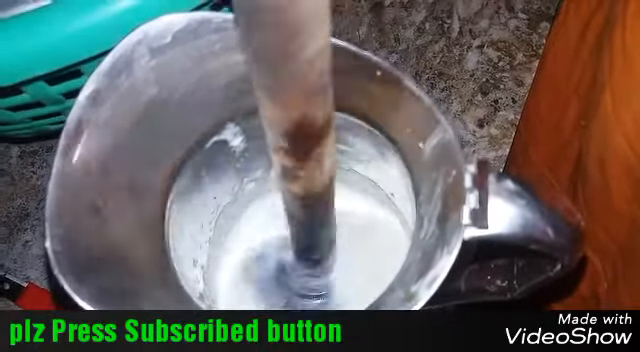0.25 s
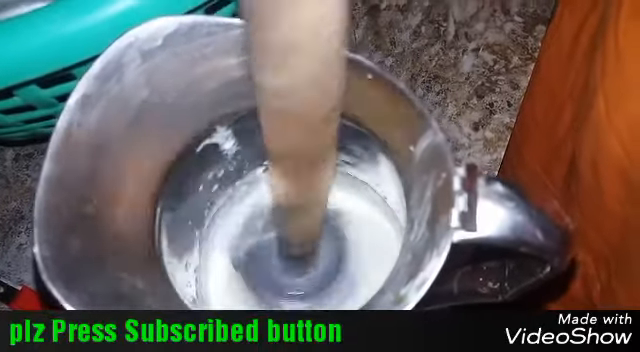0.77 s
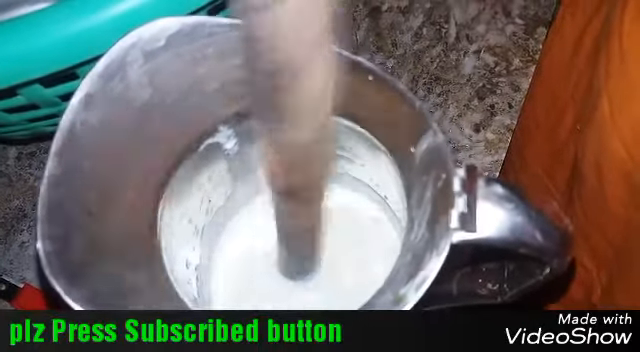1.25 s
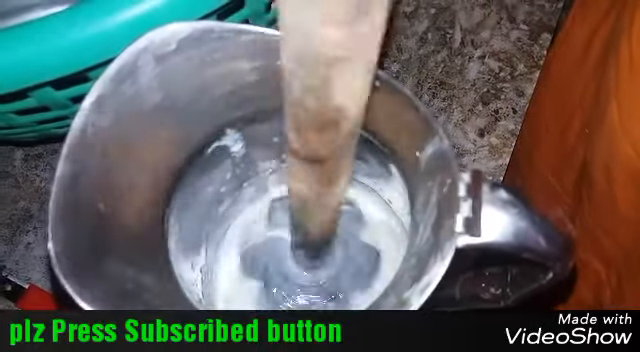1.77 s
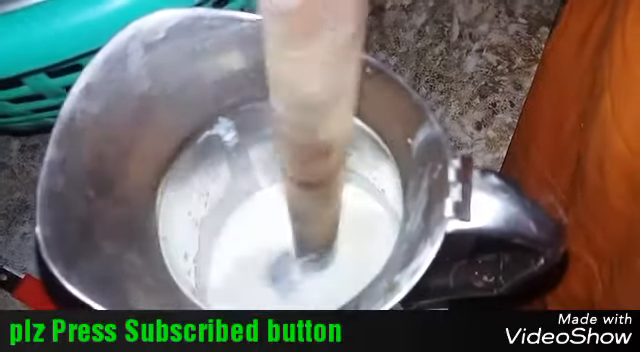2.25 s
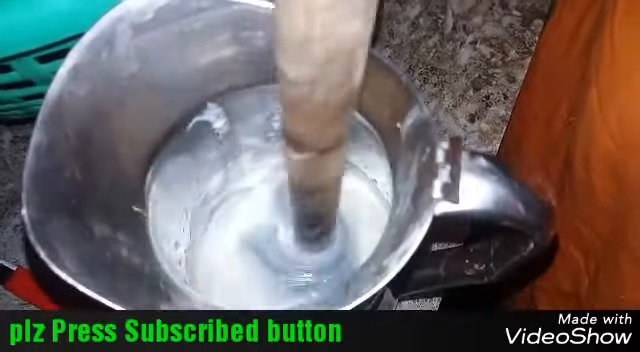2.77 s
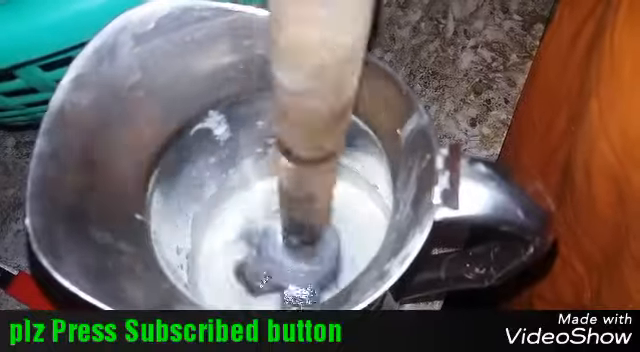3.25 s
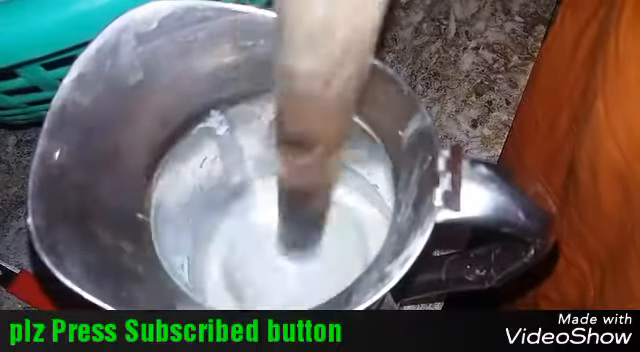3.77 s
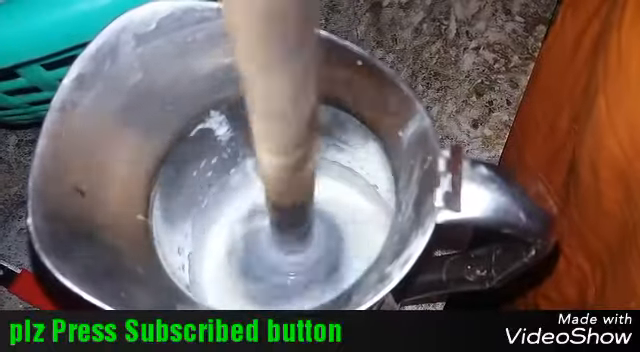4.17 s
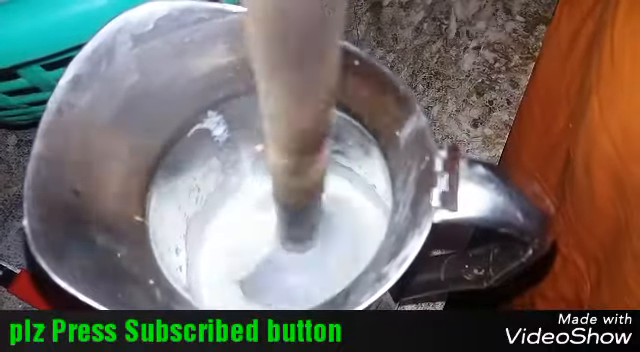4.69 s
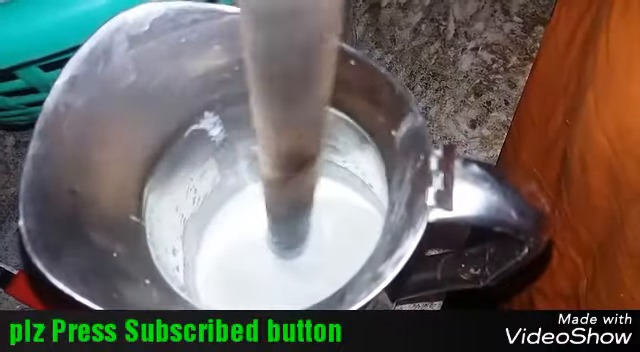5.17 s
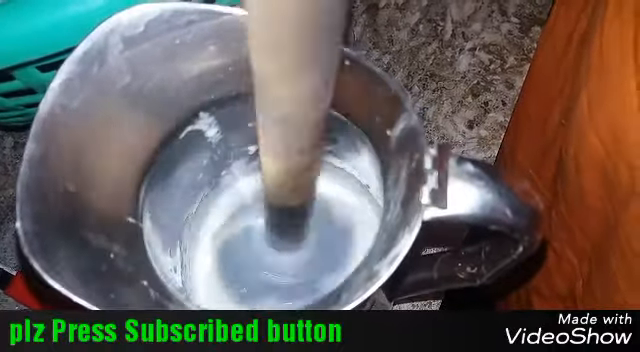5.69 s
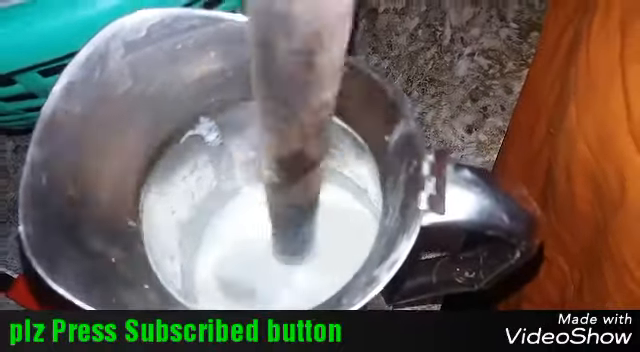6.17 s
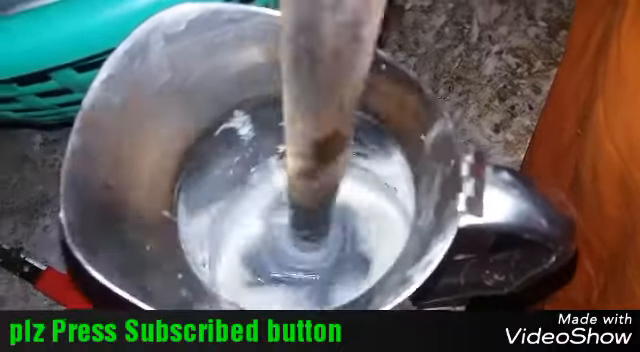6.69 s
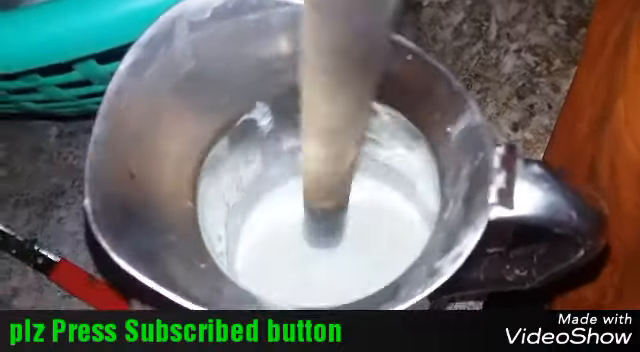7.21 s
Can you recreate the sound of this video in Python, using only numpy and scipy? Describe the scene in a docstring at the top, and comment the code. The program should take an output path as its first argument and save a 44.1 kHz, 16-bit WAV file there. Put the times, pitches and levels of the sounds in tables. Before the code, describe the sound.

A wooden hand churner spins to and fro in thin yogurt inside a steel jug. Quick, uneven wet slaps and light clacks hit the wall over hollow gulps, a low slosh and fizzing bubbles. The jug rings briefly and now and then rocks on the counter with a dull thud. The churning slackens after about five seconds, then picks up again. The microphone is close, in a quiet kitchen.

```python
"""Churning yogurt in a steel jug

A kitchen, the microphone close to the jug. A wooden hand churner is spun to and fro in thin yogurt.
Its head traps air with low gulps, slaps liquid on the wall and throws up drops and bubbles.
The jug rings along and rocks on the counter; the room adds a short tail and a steady hush."""
import sys
import numpy as np
from scipy import signal
from scipy.fft import rfft, irfft, next_fast_len
from scipy.io import wavfile
from scipy.ndimage import uniform_filter1d

SR = 44100
rng = np.random.default_rng(int(sys.argv[2]) if len(sys.argv) > 2 else 0)


def master(y):
    """Save y as 16-bit WAV."""
    cut = np.clip(np.atleast_2d(y).T, -1, 1)
    pcm = np.round(cut * 32767)  # scale
    wavfile.write(sys.argv[1], SR, pcm.astype(np.int16))


N = 328545

# spectrum of the kitchen air: freq_hz, level_db
HUSH_SPECTRUM = [(15, -49), (32, 21), (133, 25.5), (197, 2), (554, -64), (1920, 0), (2780, -30),
                 (4250, 4.5), (11000, -50)]
# how long the kitchen rings: freq_hz, t60_s
KITCHEN_DECAY = [(150, 0.93), (500, 0.55), (1500, 0.23), (4000, 0.37), (9000, 0.39)]
# thuds of the jug's base on the counter: start_s, level_db, pitch_hz
ROCKS = [(0.804, -19, 80.6), (1.38, -17, 117), (1.749, -27, 97), (1.814, -17, 203), (2.583, -25, 117),
         (2.809, -10.5, 203), (2.929, -22.5, 103), (3.282, -18.5, 200), (3.58, -34, 113), (3.809, -28, 206),
         (3.942, -27, 205), (4.286, -21, 101), (4.288, -15, 198), (4.34, -16, 190), (4.547, -13, 199),
         (4.624, -17, 205), (5.599, -26, 222), (5.798, -28, 200), (6.153, -50, 191), (6.24, -42, 200),
         (6.475, -24, 194), (6.558, -15.5, 219), (6.989, -24, 113)]
# modes of the jug's wall and air column: pitch_hz, level_db, t60_s
JUG_MODES = [(220, 5.5, 0.076), (306, 4, 0.22), (371, 2, 0.085), (481, 1.5, 0.27), (710, 7.5, 0.092),
             (1110, -22, 0.094), (1517, 18.5, 0.019), (1923, 17.5, 0.13), (2632, 16.5, 0.0084),
             (3250, 10, 0.031), (4070, 9.5, 0.02), (4572, 10.5, 0.025), (4900, 17.5, 0.002)]
# effort of the churning, as levels of liquid, small drops and finest drops:
# time_s, slosh_db, spray_db, spit_db
EFFORT = [(0.0, -17, -31, -28), (0.08, -53, -38, -64), (0.37, -30, -23.5, -28), (0.77, -28, -30, -57),
          (1.37, -35.5, -46.5, -51), (1.64, -35, -29.5, -52), (2.22, -32.5, -35.5, -63),
          (2.59, -34, -42.5, -71), (3.3, -36, -31.5, -43), (3.57, -34.5, -36, -45),
          (4.732, -30.5, -28, -31.5), (5.31, -45.5, -53.5, -65), (5.62, -41.5, -44, -41.5),
          (6.27, -39.5, -49, -79), (6.6, -29, -28, -33.5), (6.93, -31.5, -40, -32),
          (7.12, -30.5, -42.5, -94), (7.45, -51, -58, -73)]
# spectrum of the turning liquid: freq_hz, level_db
SLOSH_SPECTRUM = [(18, -32), (30, -37), (92, -3), (140, -21), (197, -1.5), (263, -5.5), (419, 3), (466, 3),
                  (877, -17), (1100, -13), (1430, -68)]
# spectrum of the fizzing drops: freq_hz, level_db
SPRAY_SPECTRUM = [(470, -38), (800, -20), (1120, 5), (1470, 17.5), (1870, 19), (2190, -4.5), (2500, 14.5),
                  (4540, 11.5), (6300, 8.5), (12400, 11.5), (14600, -61)]
# short bright bursts of treble hiss, mostly at the slaps: start_s, level_db
HISS_BURSTS = [(0.1336, -28.5), (0.2394, -23), (0.6205, -16), (0.801, -14.5), (0.9645, -23), (1.065, -19.5),
               (1.1656, -13), (1.202, -21), (1.5663, -21), (1.854, -21.5), (2.147, -20), (2.8864, -17.5),
               (3.5356, -23), (4.136, -14.5), (4.265, -16), (4.289, -13), (4.344, -15), (4.7321, -17),
               (4.7815, -17), (4.88, -21), (5.025, -22), (6.5316, -24), (6.9423, -17)]
# large single bubbles that chirp upward: start_s, level_db, pitch_hz, glide_ratio
BIG_BUBBLES = [(0.1386, -22, 1800, 0.58), (0.877, -9, 1372, 0.8), (1.123, -11.5, 1290, 0.58),
               (1.872, -20, 1600, 0.42), (2.222, -19, 1410, 0.7), (2.327, -10.5, 1447, 0.4),
               (2.364, -14.5, 1114, 2.4), (2.908, -16.5, 1030, 0.35), (3.245, -7.5, 2300, 1.05),
               (4.095, -11.5, 1407, 0.21), (4.759, -15, 1234, 0.54), (5.088, -20.5, 1650, 0.14),
               (5.6081, -14.5, 1310, 0.63), (6.5287, -20, 1440, 0.11), (6.681, -22, 1410, 0.22),
               (6.776, -16, 1324, 0.57), (6.9549, -25, 1720, 0.3), (7.084, -15.5, 1284, 0.44),
               (7.181, -25, 1470, 0.38), (7.3, -26.5, 1336, 0.86)]
# air pockets trapped by the churner head: start_s, level_db, pitch_hz, t60_s
GULPS = [(0.059, -18, 480, 0.033), (0.191, -22.5, 411, 0.075), (0.245, -18, 504, 0.02),
         (0.279, -15, 497, 0.071), (0.421, -23, 650, 0.033), (0.496, -16.5, 437, 0.017),
         (0.543, -22.5, 600, 0.035), (0.566, -24, 383, 0.043), (0.662, -19.5, 395, 0.098),
         (0.719, -19, 454, 0.0075), (0.802, -19, 373, 0.029), (0.978, -24, 420, 0.058),
         (1.111, -17.5, 647, 0.024), (1.139, -19, 496, 0.11), (1.178, -17, 401, 0.11),
         (1.439, -16, 436, 0.045), (1.472, -28, 462.5, 0.41), (1.563, -27, 386, 0.068),
         (1.732, -26.5, 483, 0.019), (1.811, -20, 414, 0.087), (1.873, -34, 439, 0.2),
         (1.998, -21.5, 384, 0.078), (2.139, -22.5, 485.4, 0.24), (2.3, -19.5, 422, 0.055),
         (2.424, -28, 537, 0.11), (2.692, -27.5, 517, 0.022), (2.802, -25, 477, 0.017),
         (2.814, -17.5, 415, 0.091), (2.945, -25, 376, 0.007), (3.278, -20.5, 453, 0.022),
         (3.29, -23.5, 394, 0.11), (3.43, -25, 513, 0.033), (3.575, -13, 494, 0.25),
         (3.612, -14, 454, 0.05), (3.658, -21, 461.7, 0.19), (3.694, -26, 457, 0.088),
         (3.757, -22.5, 487, 0.11), (3.815, -16, 401, 0.052), (3.95, -27, 397, 0.079),
         (4.039, -25.5, 388, 0.06), (4.174, -21.5, 385, 0.092), (4.287, -19.5, 418, 0.17),
         (4.401, -14, 466, 0.015), (4.436, -23.5, 465.3, 0.16), (4.543, -17.5, 517, 0.045),
         (4.585, -21.5, 431, 0.086), (4.613, -18, 478, 0.019), (4.722, -24, 560, 0.062),
         (4.809, -25.5, 488, 0.39), (5.027, -19, 517, 0.05), (5.274, -31, 514, 0.048),
         (5.356, -27.5, 537, 0.031), (5.483, -25.5, 550, 0.046), (5.518, -23.5, 492, 0.41),
         (5.6, -24, 496, 0.27), (5.798, -30, 334, 0.02), (5.944, -31.5, 358, 0.031),
         (6.013, -24, 369, 0.04), (6.159, -30.5, 480, 0.047), (6.24, -26.5, 445, 0.018),
         (6.423, -22.5, 494, 0.068), (6.481, -16, 476, 0.011), (6.568, -19, 458, 0.022),
         (6.603, -25.5, 459, 0.089), (6.727, -29.5, 488, 0.12), (6.905, -25.5, 505, 0.027),
         (6.937, -28.5, 557, 0.07), (6.99, -25, 390, 0.017), (7.085, -29.5, 577, 0.034),
         (7.203, -18.5, 500, 0.14), (7.281, -23.5, 516, 0.057)]
# liquid and wood hitting the wall, short ones dry, long ones wet: start_s, level_db, centre_hz, t60_s
SLAPS = [(0.0034, -3, 3840, 0.023), (0.0559, -9, 4100, 0.052), (0.1327, -12, 1730, 0.037),
         (0.19, -5.5, 2680, 0.026), (0.21, -17, 1530, 0.041), (0.239, -7.5, 4500, 0.022),
         (0.2682, -5.5, 1480, 0.065), (0.392, -14.5, 4100, 0.036), (0.4214, -5.5, 2700, 0.026),
         (0.482, -3.5, 2600, 0.019), (0.4998, -20.5, 3930, 0.24), (0.538, -7.5, 1670, 0.043),
         (0.6, -6.5, 5400, 0.015), (0.621, -9.5, 4660, 0.0055), (0.634, -2, 2960, 0.041),
         (0.6574, -3, 3520, 0.014), (0.685, -8.5, 1790, 0.081), (0.7014, -9.5, 4180, 0.027),
         (0.7497, -14, 3920, 0.064), (0.7786, -2.5, 1580, 0.014), (0.787, -4, 3130, 0.046),
         (0.8626, -10, 4360, 0.019), (0.879, -6.5, 4800, 0.039), (0.954, -13, 2530, 0.025),
         (0.9618, -8, 3900, 0.028), (0.9785, -3.5, 2530, 0.036), (1.063, -12, 4000, 0.028),
         (1.1112, -6.5, 2840, 0.053), (1.1304, -9, 2070, 0.0091), (1.1518, -10.5, 1450, 0.033),
         (1.1701, -5.5, 2600, 0.051), (1.2004, -4.5, 3880, 0.033), (1.334, -15, 2990, 0.04),
         (1.4356, -5, 1840, 0.059), (1.566, -2, 4530, 0.02), (1.605, -16.5, 2700, 0.05),
         (1.7174, -18, 4050, 0.06), (1.807, -1, 3010, 0.038), (1.8556, -13, 3540, 0.035),
         (1.903, -22, 4480, 0.0033), (1.965, -10, 1690, 0.032), (2.0542, -1.5, 3760, 0.017),
         (2.094, -12, 3440, 0.045), (2.14, -5, 2720, 0.039), (2.184, -12, 3750, 0.027),
         (2.2535, -13, 1930, 0.048), (2.297, -7.5, 1835, 0.13), (2.4256, -11.5, 2550, 0.02),
         (2.4368, -10.5, 3840, 0.037), (2.503, -18, 3000, 0.028), (2.568, -15.5, 2900, 0.068),
         (2.6173, -19, 1740, 0.052), (2.6946, -22, 1620, 0.078), (2.7675, -17, 4260, 0.03),
         (2.803, -3, 2730, 0.059), (2.864, -15, 2320, 0.033), (2.8876, -17.5, 1450, 0.077),
         (2.903, -11, 1660, 0.047), (2.9167, -10, 4380, 0.029), (2.996, -14, 1830, 0.054),
         (3.0644, -13.5, 3480, 0.05), (3.135, -15.5, 3130, 0.037), (3.1782, -20.5, 1940, 0.057),
         (3.278, -6, 2770, 0.042), (3.3146, -11.5, 4570, 0.033), (3.4272, -12, 1720, 0.047),
         (3.49, -0.5, 4700, 0.019), (3.5384, -16, 4500, 0.023), (3.5812, -5, 4860, 0.038),
         (3.596, -8.5, 1530, 0.057), (3.7565, -12, 3600, 0.025), (3.8028, -7, 2820, 0.068),
         (3.86, -15.5, 2400, 0.056), (3.872, -11, 3660, 0.013), (3.902, -14.5, 2260, 0.058),
         (3.93, -11, 1790, 0.089), (3.958, -9.5, 2770, 0.014), (4.0287, -8.5, 4840, 0.041),
         (4.0415, -6, 1940, 0.057), (4.0661, -9.5, 1880, 0.061), (4.072, -15.5, 4150, 0.012),
         (4.146, -19, 1530, 0.16), (4.2694, -4.5, 5470, 0.015), (4.28, -7.5, 2650, 0.032),
         (4.291, -1, 1940, 0.035), (4.3462, -8.5, 2850, 0.018), (4.359, -5, 4600, 0.017),
         (4.378, -15, 3800, 0.0092), (4.4014, -6.5, 1350, 0.038), (4.448, -5.5, 1630, 0.054),
         (4.472, -6, 3350, 0.021), (4.5242, -14, 3900, 0.03), (4.54, -1, 1704, 0.066),
         (4.576, -7.5, 2380, 0.012), (4.6483, -8.5, 4500, 0.025), (4.7148, -12.5, 3880, 0.03),
         (4.7418, -8.5, 4370, 0.023), (4.7515, -10.5, 3160, 0.065), (4.7822, 2.5, 3400, 0.024),
         (4.815, -5.5, 3570, 0.03), (4.858, -9.5, 4200, 0.044), (4.8818, -0.5, 3600, 0.02),
         (4.947, -12.5, 4830, 0.058), (4.9904, -21, 1790, 0.079), (5.025, -18.5, 1830, 0.055),
         (5.106, -25, 4230, 0.016), (5.356, -21, 3870, 0.037), (5.483, -22.5, 3750, 0.12),
         (5.5158, -7, 3330, 0.027), (5.591, -4, 3480, 0.036), (5.6486, -15, 3770, 0.021),
         (5.7778, -11.5, 2850, 0.022), (5.794, -16, 1540, 0.023), (5.843, -27, 5100, 0.027),
         (5.867, -25, 1700, 0.023), (5.901, -20.5, 1520, 0.069), (5.928, -19, 4350, 0.026),
         (5.962, -19, 4230, 0.033), (6.0103, -17, 1620, 0.058), (6.157, -34, 1640, 0.086),
         (6.234, -27, 1660, 0.12), (6.358, -12, 3850, 0.024), (6.4086, -20, 2000, 0.043),
         (6.4597, -3.5, 2720, 0.012), (6.4791, -4, 1900, 0.028), (6.564, -18, 1380, 0.11),
         (6.6058, -6, 4500, 0.049), (6.672, -15, 1404, 0.045), (6.708, -6, 4700, 0.0098),
         (6.724, -3, 3370, 0.023), (6.735, -10.5, 2650, 0.19), (6.8215, -5.5, 4400, 0.014),
         (6.853, -11, 1660, 0.043), (6.8989, -11, 2600, 0.06), (6.9402, -16.5, 1900, 0.069),
         (6.985, -2, 2700, 0.0092), (6.992, -3.5, 1950, 0.039), (7.204, -18, 1800, 0.03)]
# level of a faint random left-right flutter, side against mid: freq_hz, level_db
FLUTTER_SPECTRUM = [(60, -6.5), (180, -21.5), (530, -17), (1590, -21), (4730, -26), (14100, -6.5)]
# response of the microphone: freq_hz, gain_db
MIC_RESPONSE = [(20, -9), (45, -9.5), (80, -8), (5000, -1), (7000, -10), (11000, -16), (13000, -35.5),
                (15000, -27)]


def gain_of(db):
    """Decibels to gain."""
    return 10 ** (np.asarray(db) / 20)


def unit_rms(x):
    """Scales to rms 1."""
    return x / np.sqrt(np.mean(x ** 2) + 1e-20)


def value_at(points, hz):
    """Reads a table on a log frequency axis."""
    freq_hz, value = np.transpose(points)
    return np.interp(np.log(hz + 1), np.log(freq_hz + 1), value)


def add(mix, start_s, sound):
    """Adds a sound at a time."""
    part = mix[round(start_s * SR):][:len(sound)]
    part += sound[:len(part)]


def coloured(x, spectrum):
    """Filters by a spectrum table."""
    size = next_fast_len(len(x))
    gain = gain_of(value_at(spectrum, np.fft.rfftfreq(size, 1 / SR)))
    return irfft(rfft(x, size) * gain, size)[:len(x)]


def band(x, lo_hz, hi_hz):
    """Causal band-pass."""
    return signal.sosfilt(signal.butter(2, [lo_hz, hi_hz], "band", fs=SR, output="sos"), x)


def effort_gains():
    """Slosh, spray and spit gains at every sample."""
    time_s, *levels_db = np.transpose(EFFORT)
    return [gain_of(np.interp(np.arange(N) / SR, time_s, db)) for db in levels_db]


def flicker(depth_db, samples):
    """A random gain that wanders by depth_db rms over about this many samples."""
    drift = uniform_filter1d(rng.standard_normal(N), samples)
    return gain_of(depth_db * unit_rms(uniform_filter1d(drift, samples // 2)))


def ping(hz, t60, glide, rise_s):
    """A dying tone; with glide its pitch climbs, as a bubble's does near the surface."""
    t = np.arange(round(t60 * SR) + 50) / SR
    tone = np.sin(2 * np.pi * hz * t * (1 + glide * t / t60))
    return tone * gain_of(-60 * t / t60) * (1 - np.exp(-t / rise_s))


def kitchen_hush():
    """Steady room tone, far behind the jug."""
    return gain_of(-47) * unit_rms(coloured(rng.standard_normal(N), HUSH_SPECTRUM))


def kitchen_tail(near):
    """The room answers with sparse reflections of random sign, each band dying at its own speed."""
    taps = np.zeros(SR // 2)
    at = np.arange(150, len(taps) - 20, 20)
    taps[at + rng.integers(0, 20, len(at))] = rng.choice([-1., 1.], len(at))
    hz, t, spectra = signal.stft(taps, SR, nperseg=256)
    decay = gain_of(-60 * t / value_at(KITCHEN_DECAY, hz)[:, None])
    room = signal.istft(spectra * decay, SR, nperseg=256)[1]
    return signal.fftconvolve(near, room / np.linalg.norm(room))[:N]


def jug_rocking():
    """The base rocks on the counter with dull low thuds."""
    out = np.zeros(N)
    for start_s, db, hz in ROCKS:
        add(out, start_s, gain_of(db) * ping(hz, t60=0.13, glide=0, rise_s=0.003))
    return out


def jug_ring(drive):
    """Modes of the steel wall and the air inside, rung by whatever happens in the liquid."""
    t = np.arange(SR // 2) / SR
    ring = sum(gain_of(db - 60 * t / t60) * np.sin(2 * np.pi * hz * t) / np.sqrt(t60)
               for hz, db, t60 in JUG_MODES)
    return signal.oaconvolve(drive, ring / np.linalg.norm(ring))[:N]


def slosh():
    """Lumpy low wash of the turning liquid, surging after each trapped pocket."""
    stir, t = np.zeros(N), np.arange(12000) / SR
    for start_s, db, *_ in GULPS:
        add(stir, start_s, gain_of(db - 60 * t / 0.29))
    surge = (stir + 0.011) / (uniform_filter1d(stir, 15000) + 0.026)
    wash = coloured(rng.standard_normal(N), SLOSH_SPECTRUM) * flicker(3.5, samples=1500)
    return unit_rms(wash * np.sqrt(surge))


def small_bubbles(per_s, spread_db, range_hz, cycles, glide):
    """A swarm of bubbles at random times on 30 pitches; a few stand out."""
    out = np.zeros(N + SR)
    for hz in np.geomspace(*range_hz, 30):
        grain = ping(hz, cycles / hz, glide, rise_s=1 / hz)
        starts = rng.integers(0, N, round(per_s * N / SR / 30))
        levels_db = spread_db * np.minimum(rng.exponential(1, len(starts)), 4)
        gains = gain_of(levels_db) * np.sqrt(hz) / np.linalg.norm(grain)
        positions = starts[:, None] + np.arange(len(grain))
        out += np.bincount(positions.ravel(), np.outer(gains, grain).ravel(), len(out))
    return unit_rms(out[:N])


def spray(froth, spray_gain, spit_gain):
    """Wet fizz, chirps and fine spits follow the churning and crowd after each slap, along with foam."""
    crowd = (froth + 0.034) / (uniform_filter1d(froth, 12000) + 0.027)  # highest just after a slap
    hiss = rng.standard_normal(N)  # bubbles too small to tell apart
    crackle = small_bubbles(per_s=700, spread_db=3.5, range_hz=(900, 7000), cycles=20, glide=0.2)
    fizz = coloured(crackle + 0.5 * hiss, SPRAY_SPECTRUM)
    fizz = unit_rms(fizz * crowd ** 0.75 * flicker(3, samples=1100))
    chirps = small_bubbles(per_s=60, spread_db=2, range_hz=(1200, 4800), cycles=40, glide=0.25)
    drops = fizz + gain_of(-4) * np.sqrt(crowd) * chirps
    bursts = crowd * flicker(6, samples=900)
    mist = small_bubbles(per_s=250, spread_db=2.5, range_hz=(6500, 13000), cycles=30, glide=0.1)
    spits = unit_rms(bursts * band(mist, 6500, 13500))
    foam = small_bubbles(per_s=900, spread_db=3, range_hz=(1100, 4800), cycles=30, glide=0.25)
    return spray_gain * drops + spit_gain * spits + gain_of(-20.5) * froth * foam


def hiss_bursts(t60_s=0.039, rise_s=0.0013):
    """Short bright bursts of treble hiss, mostly at the slaps."""
    envelope, t = np.zeros(N), np.arange(6000) / SR
    for start_s, db in HISS_BURSTS:
        add(envelope, start_s, gain_of(db - 60 * t / t60_s) * (1 - np.exp(-t / rise_s)))
    return envelope * flicker(1.1, samples=100) * unit_rms(band(rng.standard_normal(N), 7200, 13500))


def big_bubbles():
    """Single bubbles near the surface with clear rising chirps."""
    out = np.zeros(N)
    for start_s, db, hz, glide in BIG_BUBBLES:
        add(out, start_s, gain_of(db) * ping(hz, t60=0.044, glide=glide, rise_s=0.003))
    return out


def gulps():
    """Trapped air pockets ring, unsteady in the moving liquid, with a push and a dull wooden knock."""
    (pockets, knocks, pushes), t = np.zeros((3, N)), np.arange(3000) / SR
    wobble = flicker(1.8, samples=400)
    for start_s, db, hz, t60 in GULPS:
        tone = ping(hz, np.clip(t60, 0.02, 0.45), glide=0.03, rise_s=0.003)
        add(pockets, start_s, gain_of(db) * tone / abs(tone).max())
        force = gain_of(db) * (0.017 / t60) ** 0.16  # the longer the ring, the softer the knock
        add(knocks, start_s, force * gain_of(-60 * t / 0.1) * rng.standard_normal(len(t)))
        add(pushes, start_s, force * np.exp(-t / 0.0003))
    return pockets * wobble + band(gain_of(6) * knocks + gain_of(-1.5) * pushes, 212, 686)


def slap_cluster(centre_hz, t60):
    """Six chirping bubbles around one pitch, spread over a slap, the later ones fainter."""
    out = np.zeros(6000)
    for delay, detune in rng.random((6, 2)):
        hz = centre_hz * 1.712 ** (2 * detune - 0.8)
        chirp = ping(min(hz, 5500), t60=45 / hz, glide=0.1, rise_s=1 / hz)
        add(out, delay ** 2 * t60 * 0.7, gain_of(-24 * delay ** 2) * chirp)
    return out


def slap_crackle(t, centre_hz, t60):
    """The splash of one slap: clumpy noise, a narrow band at its centre over a broad one."""
    noise, clumps = rng.standard_normal((2, len(t)))
    envelope = gain_of(-60 * t / t60) * (1 - np.exp(-t / (0.025 * t60)))
    burst = noise * envelope * gain_of(1.9 * unit_rms(uniform_filter1d(clumps, 90)))
    narrow = unit_rms(band(burst, centre_hz / 1.077, centre_hz * 1.109))
    broad = unit_rms(band(burst, centre_hz / 1.44, 5570))
    crackle = narrow + 1.05 * broad
    return crackle / abs(crackle).max()


def slaps():
    """Liquid and wood hit the wall. Returns the sound, the froth envelope and the blows on the steel."""
    (out, froth, blows), t = np.zeros((3, N)), np.arange(6000) / SR
    for start_s, db, hz, t60 in SLAPS:
        wet_db = 6.5 * np.log2(t60 / 0.036)  # a longer slap has a softer pop and more froth
        pop = ping(hz, t60=24 / hz, glide=0.082, rise_s=0.5 / hz)
        add(out, start_s, gain_of(db - 4) * slap_crackle(t, hz, t60))
        add(out, start_s, gain_of(db - 6 - wet_db) * pop)
        add(out, start_s, gain_of(db - 13.5 + wet_db) * slap_cluster(hz, t60))
        add(blows, start_s, gain_of(db + 0.5) * ping(hz, t60=3 / hz, glide=0, rise_s=0.5 / hz))
        add(froth, start_s, gain_of(db + wet_db - 60 * t / 0.11) * (1 - np.exp(-t / 0.00075)))
    return band(out, 880, 8900), froth, blows


def stereo(mid):
    """Left and right differ by a faint random flutter that follows the sound."""
    hz, _, spectra = signal.stft(mid, SR, nperseg=1024)
    scrambled = spectra * np.exp(2j * np.pi * rng.random(spectra.shape))
    flutter_gain = gain_of(value_at(FLUTTER_SPECTRUM, hz))[:, None]
    side = signal.istft(scrambled * flutter_gain, SR, nperseg=1024)[1][:N]
    return np.array([mid + side, mid - side])


def scene():
    """Liquid and jug close up, the kitchen behind them."""
    slosh_gain, spray_gain, spit_gain = effort_gains()
    slapping, froth, blows = slaps()
    wash = slosh_gain * slosh()
    gulping = gulps()
    splashes = slapping + spray(froth, spray_gain, spit_gain) + big_bubbles() + hiss_bursts()
    drive = gain_of(3.5) * gulping + gain_of(-5) * wash + gain_of(-12.5) * splashes + blows
    near = gulping + splashes + wash + jug_rocking() + jug_ring(drive)
    return stereo(kitchen_hush() + gain_of(-12.5) * kitchen_tail(near) + near)


def record(dry):
    """The microphone colours the sound; its input flattens the highest peaks and ends at 14.7 kHz."""
    clipped = np.clip([coloured(channel, MIC_RESPONSE) for channel in dry], -0.97, 0.97)
    low_pass = signal.firwin(511, 14700, window=("kaiser", 9), fs=SR)
    return signal.oaconvolve(clipped, low_pass[None], "same")


dry = scene()
out = record(dry)
master(out)
```